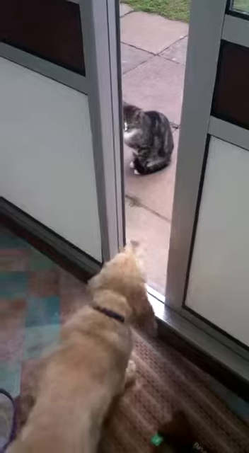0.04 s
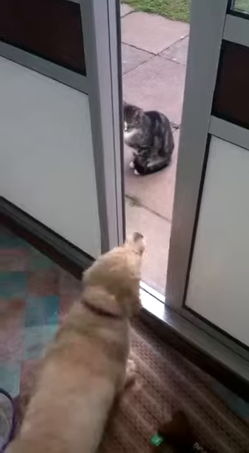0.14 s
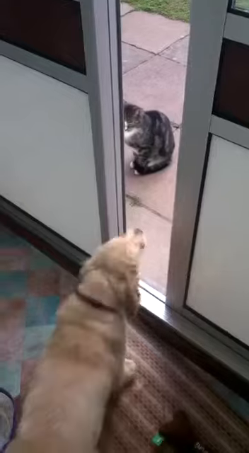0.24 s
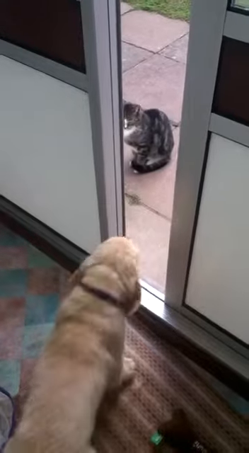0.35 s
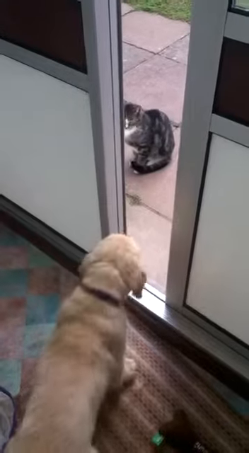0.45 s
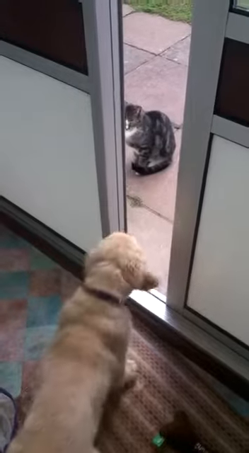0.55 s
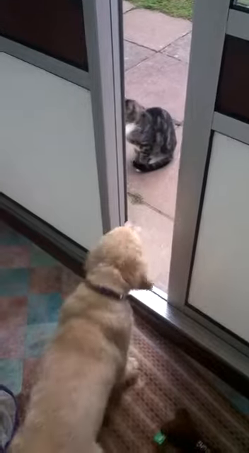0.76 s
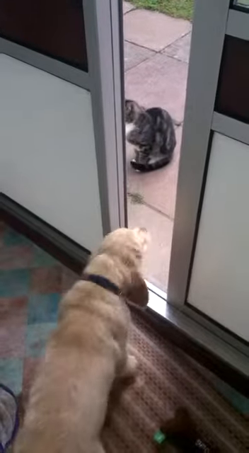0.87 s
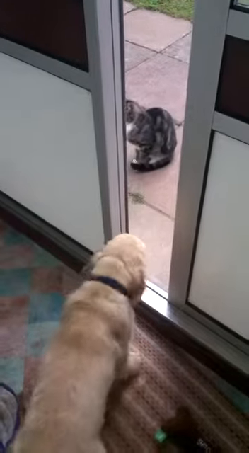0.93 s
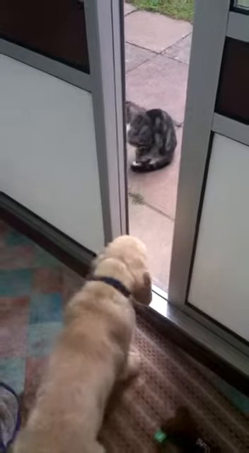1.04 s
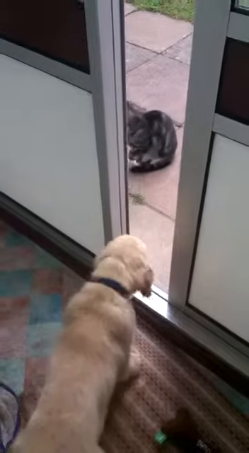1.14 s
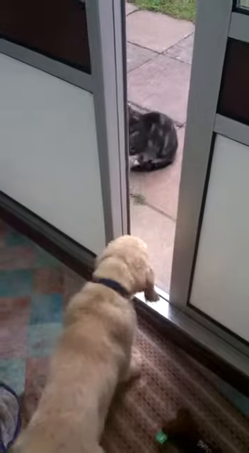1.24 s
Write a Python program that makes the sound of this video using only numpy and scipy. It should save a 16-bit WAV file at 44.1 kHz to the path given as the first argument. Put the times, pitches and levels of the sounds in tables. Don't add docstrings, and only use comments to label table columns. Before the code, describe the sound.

Two short, bright yaps from a young dog indoors, each ringing briefly off hard surfaces

```python
import sys
import numpy as np
from scipy import signal
from scipy.fft import rfft, irfft
from scipy.io import wavfile
from scipy.ndimage import uniform_filter1d

SR = 44100
rng = np.random.default_rng(int(sys.argv[2]) if len(sys.argv) > 2 else 0)


def to_linear_factor(level_db):
    exponent = np.asarray(level_db, float) / 20
    return 10 ** exponent


def unload_audio(sound):
    columns = np.transpose(np.atleast_2d(sound))
    steps = np.round(np.clip(columns, -1, 1) * 32767)
    wavfile.write(sys.argv[1], SR, steps.astype(np.int16))


N = 57330
T = np.arange(N) / SR

# (centre [Hz], width [Hz], level [dB])
THROAT = [(1886, 130, -11.5), (2550, 250, -52), (3120, 540, -17.5)]
GATE_OPENS = [-0.4136, .2, .855]


def curve(table, hz):
    a = np.array(table)
    return np.interp(np.log(np.maximum(hz, 1)), np.log(a[:, 0]), a[:, 1])


def colour(x, gain):
    return irfft(rfft(x, 2 * N) * gain(np.arange(N + 1) * SR / 2 / N), 2 * N)[..., :N]


def unit(x):
    return x / np.sqrt(np.mean(x ** 2))


def walk(rate):
    k = max(int(SR / rate), 2)
    return unit(uniform_filter1d(uniform_filter1d(rng.standard_normal(N), k), k))


def ring(hz, centre_hz, width_hz):
    return 1 / np.sqrt(1 + ((hz - centre_hz ** 2 / hz) / width_hz) ** 2)


def pair():
    # (frequency [Hz], left-right likeness [0-1])
    likeness = [(150, .9), (600, 0.4), (1200, 0.4), (8000, .05)]

    def share(sign):
        return lambda f: np.sqrt(1 + sign * np.clip(curve(likeness, f), 0, 1))

    mid, side = rng.standard_normal((2, N))
    mid, side = colour(mid, share(1)), colour(side, share(-1))
    return np.array([mid + side, mid - side]) / 2


def house():
    # (frequency [Hz], level [dB per Hz])
    hiss_tone = [(15, -52.5), (25, -27), (107, -15), (457, -24.5), (2360, -27), (5010, -35), (8350, -31.5),
                 (13900, -49.5), (15500, -31.5)]
    hum_hz, hum_db, hiss_db = 100, -56, -55.5
    side_phase = np.array([[.2], [-.2]])
    hum = np.sin(2 * np.pi * hum_hz * T + side_phase) * to_linear_factor(hum_db + 0.68 * walk(12))
    hiss = unit(colour(pair(), lambda f: to_linear_factor(curve(hiss_tone, f))))
    return hum + to_linear_factor(hiss_db + 1.5 * walk(9)) * hiss


def earlier_bark(heard):
    start_s, level_db, cut_hz = 0.606, 7, 1000
    start, length = int(start_s * SR), SR // 4
    tail = np.pad(heard[:, start:start + length], ((0, 0), (0, N - length)))
    return to_linear_factor(level_db) * colour(tail, lambda f: 1 / (1 + (f / cut_hz) ** 2) ** .5)


def gulps():
    # (time [s], pitch [Hz], level [dB], length [s])
    gulp_rows = [
        (.008, 600, -48, 0.0223),
        (.012, 400, -51.5, .025),
        (0.338, 265, -38.5, 0.048),
        (.36, 165, -47, 0.047),
        (1.017, 410, -41, 0.0212),
    ]
    total = 0
    for start, hz, db, length in gulp_rows:
        swell = np.sin(np.pi * np.clip((T - start) / length, 0, 1)) ** 2
        total = total + to_linear_factor(db) * swell * np.sin(2 * np.pi * hz * T)
    return total


def throat_voice(hz, phase, mouth, rough, throat_gain):
    mouth_width_hz, tilt_db_per_octave, chest_cut_hz = 141.55, -3.5, 341
    shimmer_db, rasp_db = 11, -4
    hoarse_db, hoarse_hz = -1, 500
    voice = weight = 0
    for k in np.arange(1, 19) / 2:
        f = k * hz
        hollows = sum(to_linear_factor(db) * ring(f, centre, width) ** 2 for centre, width, db in THROAT)
        g = ring(f, mouth, mouth_width_hz) + throat_gain * hollows
        g = g * to_linear_factor(tilt_db_per_octave * np.log2(f / 700))
        if k % 1 != 0:
            g = g * rough * to_linear_factor(rasp_db)
        g = g / (1 + (chest_cut_hz / f) ** 4) / (1 + (f / 3800) ** 6)
        shimmer = to_linear_factor(shimmer_db * rough * walk(190))
        blur = walk(hoarse_hz) * np.sin(k * phase) + walk(hoarse_hz) * np.cos(k * phase)
        hoarse = to_linear_factor(hoarse_db) * min(k / 1.86, 1) * np.sqrt(rough) * blur
        voice = voice + g * (shimmer * np.sin(k * phase) + hoarse)
        weight = weight + g ** 2 / 2
    return voice / np.sqrt(weight)


def pant():
    def hollows(f):
        return sum(ring(f + 1, centre, 2 * width) ** 2 for centre, width, db in THROAT)

    return unit(colour(rng.standard_normal(N), hollows))


def teeth_puff(puff, hz, phase):
    # (frequency [Hz], level [dB])
    air_tone = [(300, -34.5), (1500, 5), (3300, -31), (4600, -17.5), (6400, -15), (8200, -6.5),
                (11500, -25), (14000, -28.5)]
    edge_db, fall_db_per_s = -2.5, 502
    full, end, level_db, rise_db_per_s = puff
    hiss = unit(colour(rng.standard_normal(N), lambda f: to_linear_factor(curve(air_tone, f))))
    hiss = hiss * (1 + 0.21 * np.sin(phase))
    edge = sum(to_linear_factor(curve(air_tone, k * hz) + 4 * walk(200)) * np.sin(k * phase) for k in range(7, 21))
    swell_db = np.minimum(rise_db_per_s * (T - full), fall_db_per_s * (end - T))
    loudness = to_linear_factor(level_db + np.minimum(swell_db, 0) + 2.0 * walk(70))
    return (hiss + to_linear_factor(edge_db) * edge) * loudness


def bark(rows, puff):
    jitter, jaw_dulls_db_per_khz, pant_db = 0.062, -13, -21
    a = np.array(rows).T
    hz, effort_db, mouth, rough = (np.interp(T, a[0], column) for column in a[1:])
    rough = np.clip(rough, 0, 1)
    sounding = (T > a[0, 0]) * (T < a[0, -1])
    effort = uniform_filter1d(to_linear_factor(effort_db) * sounding, size=88)
    phase = 2 * np.pi * np.cumsum(hz * (1 + jitter * rough * walk(250))) / SR
    throat_gain = to_linear_factor(4.5 + jaw_dulls_db_per_khz * (mouth - 700) / 1000)
    voice = throat_voice(hz, phase, mouth, rough, throat_gain) * effort
    voice = signal.sosfilt(signal.butter(2, 260, "high", fs=SR, output="sos"), voice)
    return voice + teeth_puff(puff, hz, phase) + to_linear_factor(pant_db) * pant() * effort * throat_gain


def room(x):
    # (frequency [Hz], time [s])
    fade_times = [(200, 0.49), (600, 0.3858), (1500, 0.3645), (4000, 0.2838), (8000, 0.3404),
                  (14000, 0.267)]
    direct_db, echo_db = 1.5, -1
    noise, echo = pair(), 0
    for hz in 100 * 2 ** np.arange(0, 7.6, .5):

        def band_gain(f):
            octaves = np.clip(np.log2(np.maximum(f, 1) / hz), -.5, .5)
            return np.clip(np.cos(np.pi * octaves), 0, 1) ** 2

        echo = echo + colour(noise, band_gain) * to_linear_factor(-60 * T / curve(fade_times, hz))
    echo = echo * np.clip((T - .002) / 0.014, 0, 1)
    echo = echo / np.sqrt(np.sum(echo ** 2) / 2)
    return to_linear_factor(direct_db) * x + to_linear_factor(echo_db) * signal.fftconvolve(echo, x[None], axes=1)[:, :N]


def scene():
    # (time [s], pitch [Hz], effort [dB], mouth resonance [Hz], roughness [0-1])
    first_bark = [
        (.193, 465, -44.5, 600, 0.15),
        (.213, 577.3, -26, 643.4, .1),
        (.243, 612.8, -21.5, 1150, .25),
        (.25, 665.9, -10, 850, 0.11),
        (.268, 674.4, -16, 1000, 0.25),
        (.28, 530, -17, 1600, .25),
        (.335, 547.4, -27.5, 1620, .3),
        (.352, 355.8, -24.5, 1100, 0.5),
        (.385, 244.4, -36, 700, 0.3),
    ]
    second_bark = [
        (.843, 609.6, -48.5, 650, .04),
        (.866, 699.9, -6.5, 700, 0.015),
        (.878, 688.3, -42.5, 800, 0.038),
        (.89, 682.9, -9.5, 902.6, 0.032),
        (.912, 699.2, -16.5, 800, 0.065),
        (.918, 567.2, -21.5, 1715, 0.048),
        (.98, 544, -16.5, 1594, .04),
        (1.0, 345.7, -30.5, 1059, .15),
        (1.045, 382.3, -43.5, 500, 0.21),
    ]
    # (time full [s], time the fade starts [s], level [dB], rise [dB per s])
    puff_rows = [
        (0.247, 0.324, -28.5, 598),
        (0.887, 0.964, -31, 1100),
    ]
    puppy = bark(first_bark, puff_rows[0]) + bark(second_bark, puff_rows[1]) + gulps()
    heard = room(puppy)
    return heard + earlier_bark(heard) + house()


def microphones(dry):
    # (frequency [Hz], left minus right [dB])
    side_levels = [(60, 0.5), (380, -1), (700, -2), (1290, -0.5), (2380, -1.5), (4400, -0.5), (8120, -15),
                   (15000, -6.5)]
    # (frequency [Hz], left ahead of right [radians])
    side_phases = [(600, 0), (1200, 0.3559), (2000, 2), (9000, 2)]

    def opening(sign):
        return lambda f: to_linear_factor(sign * curve(side_levels, f) / 2) * np.exp(.5j * sign * curve(side_phases, f))

    return np.array([colour(dry[0], opening(1)), colour(dry[1], opening(-1))])


def noise_gate(x):
    hold_s, open_s, close_s, depth_db = 0.5045, 0.033, 0.1, -14.5
    is_open = 0
    for start in GATE_OPENS:
        opening = np.clip((T - start) / open_s, 0, 1)
        closing = np.clip((start + hold_s - T) / close_s, 0, 1)
        is_open = is_open + opening * closing
    return x * to_linear_factor(depth_db * (1 - is_open))


def hush_bands(x):
    # (low edge [Hz], high edge [Hz], delay after opening [s], length [s])
    hushed_bands = [(3680, 3900, .1, .12), (4450, 4800, .05, .1), (5800, 6000, .11, .12),
                    (11900, 12650, .04, .17), (12650, 13500, .16, .06), (13500, 14250, .11, .12),
                    (14250, 15800, .05, .2), (2600, 2800, .25, .1), (5100, 5300, .17, .1)]
    for low, high, after, length in hushed_bands:
        on = sum((T > start + after) * (T < start + after + length) for start in GATE_OPENS)
        band = colour(x, lambda f: (f > low) * (f < high))
        x = x - uniform_filter1d(1. * on, size=600) * band
    return x


def band_limit(x):
    return signal.sosfilt(signal.butter(12, 15700, fs=SR, output="sos"), x)


def record(dry):
    x = noise_gate(microphones(dry))
    x = np.clip(x, -1, 1)
    x = colour(x, lambda f: f < 15700)
    return band_limit(hush_bands(x))


dry = scene()
out = record(dry)
unload_audio(out)
```